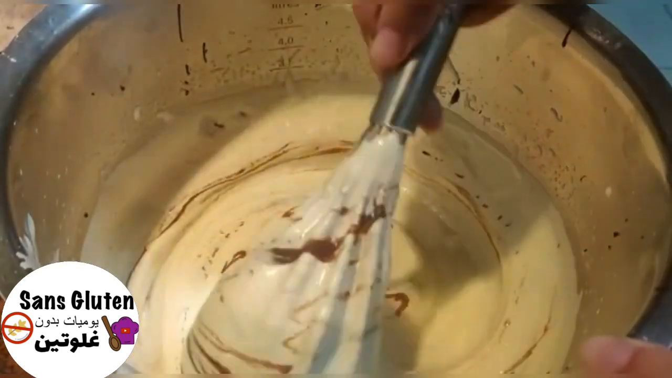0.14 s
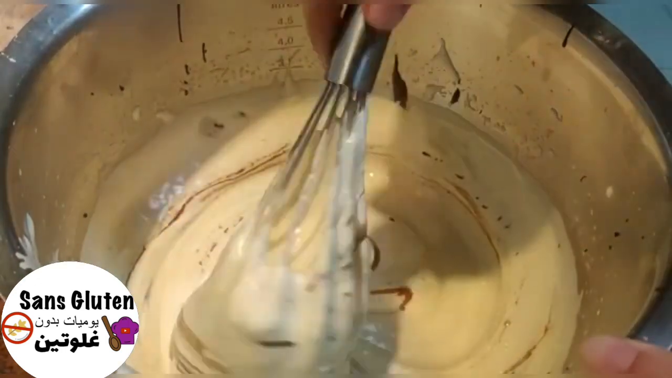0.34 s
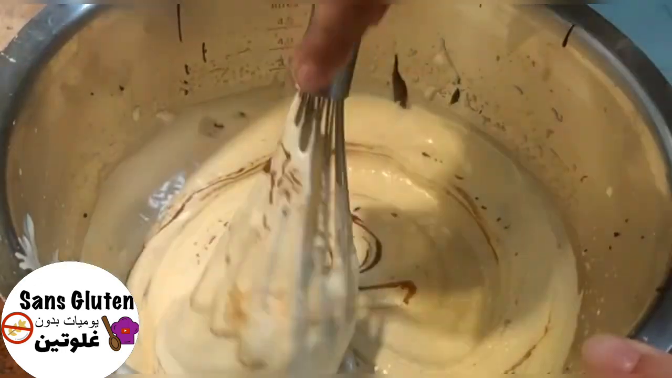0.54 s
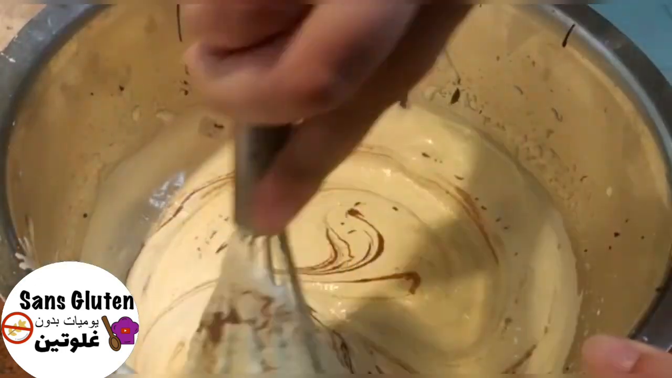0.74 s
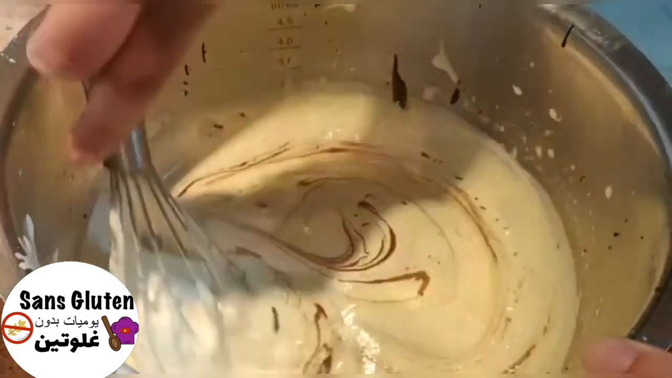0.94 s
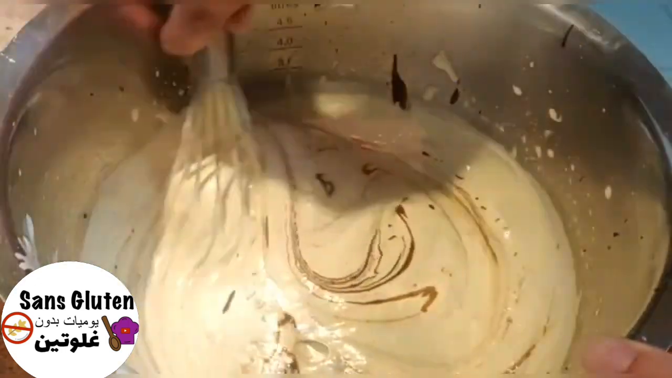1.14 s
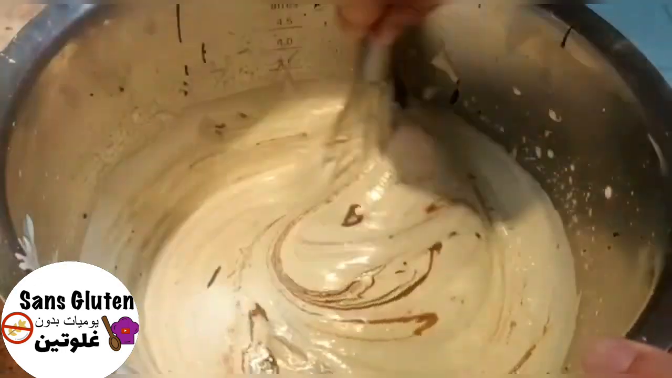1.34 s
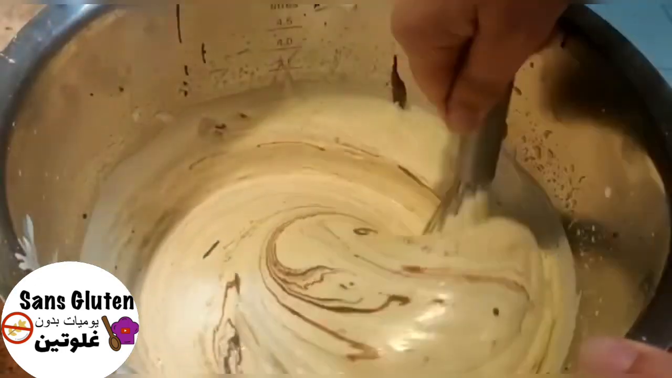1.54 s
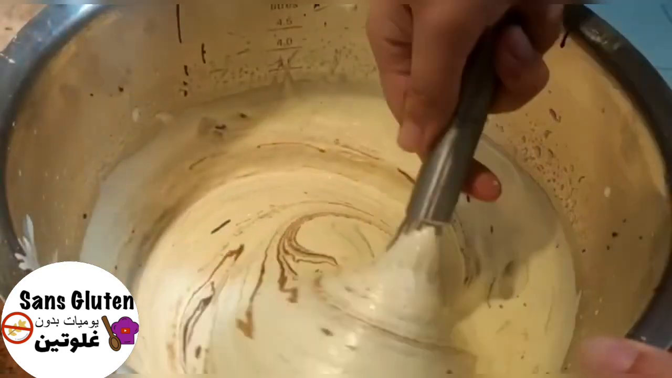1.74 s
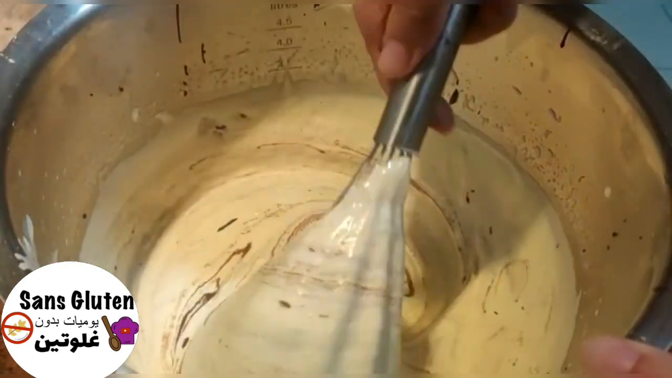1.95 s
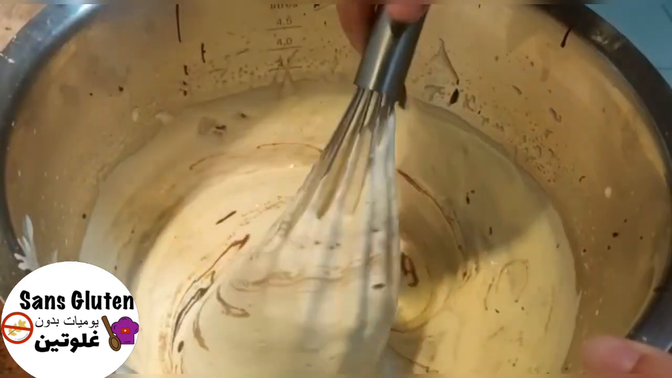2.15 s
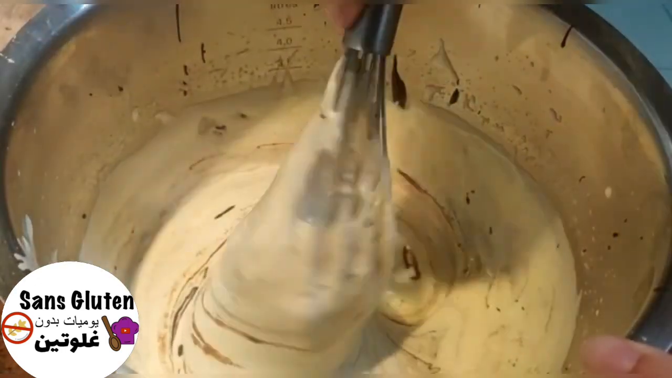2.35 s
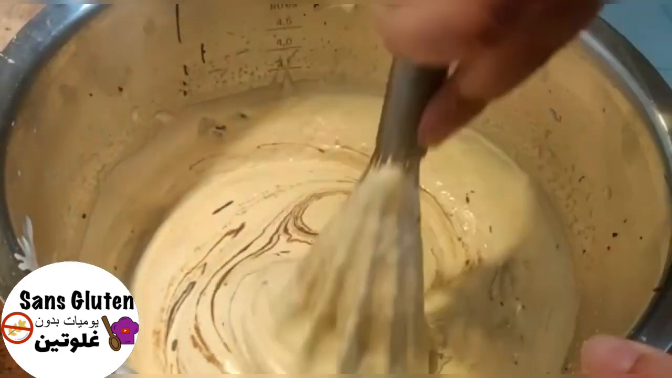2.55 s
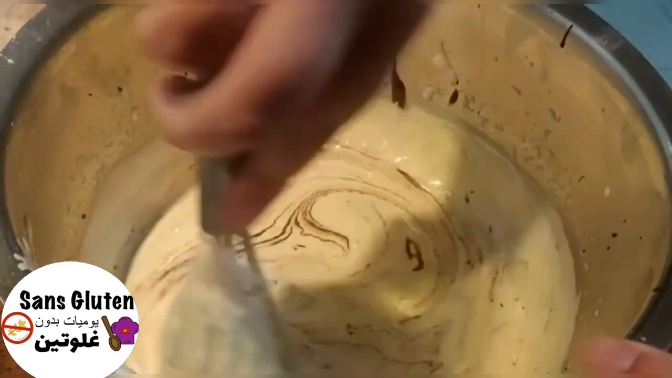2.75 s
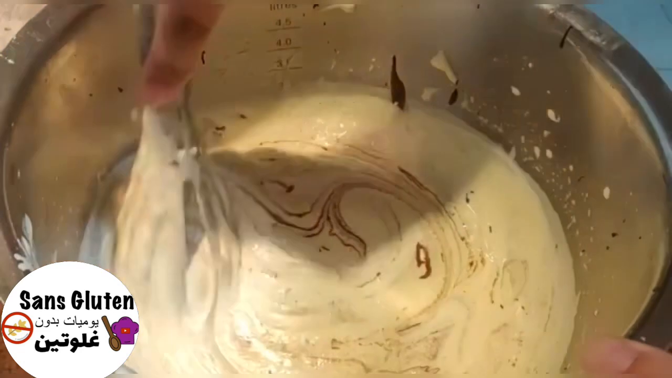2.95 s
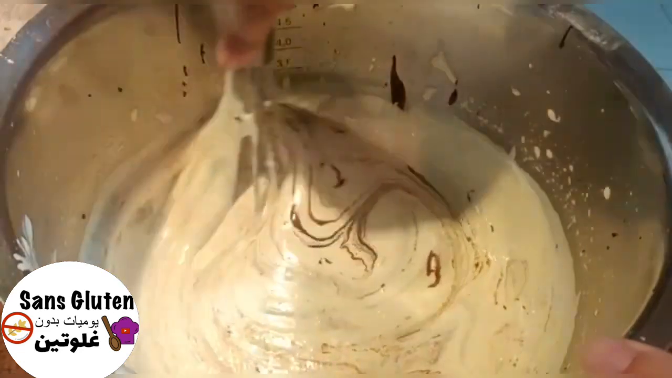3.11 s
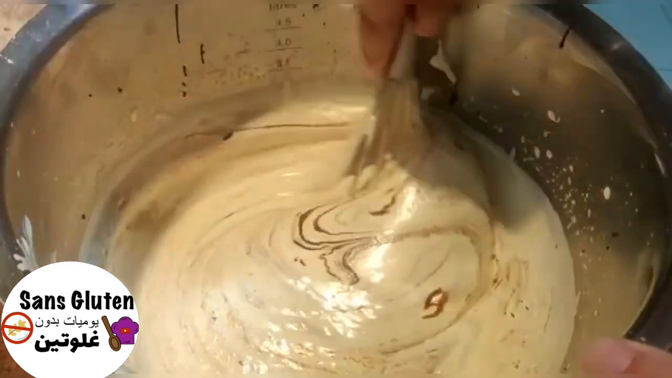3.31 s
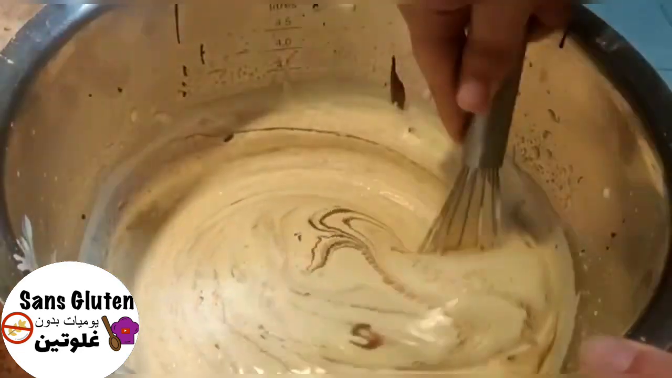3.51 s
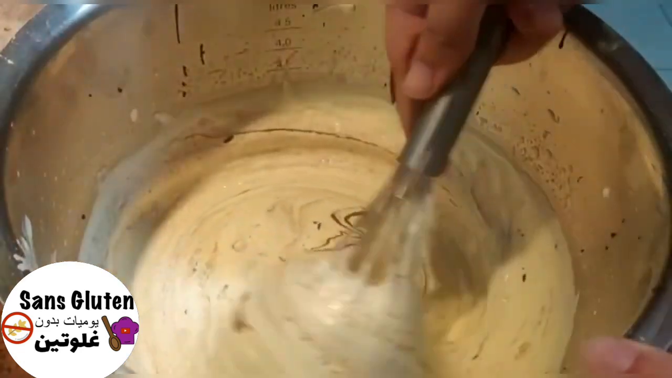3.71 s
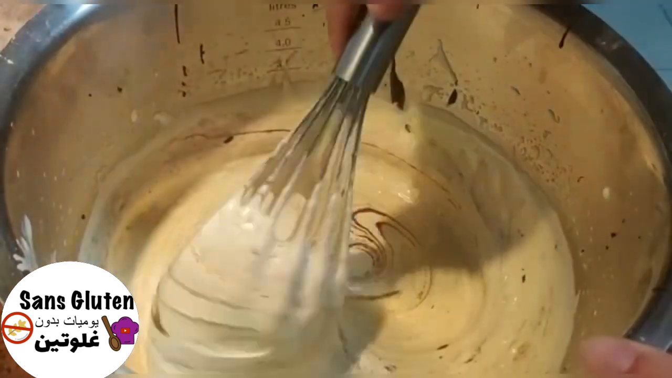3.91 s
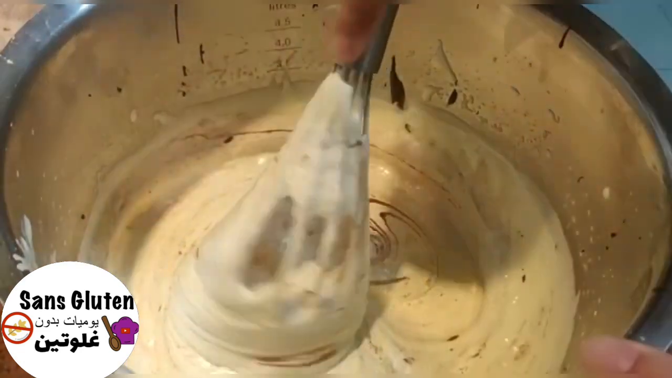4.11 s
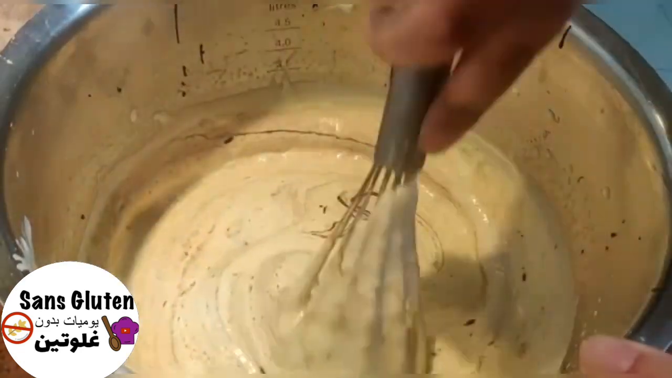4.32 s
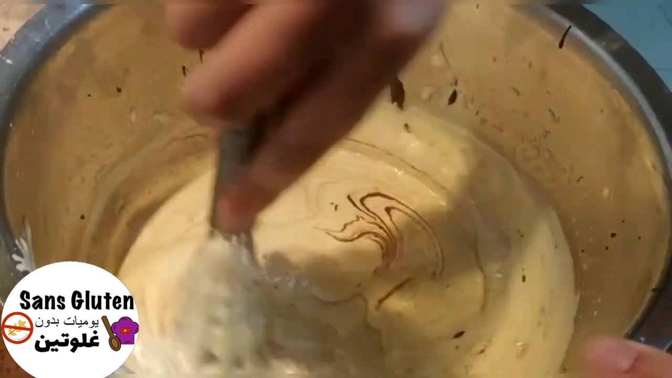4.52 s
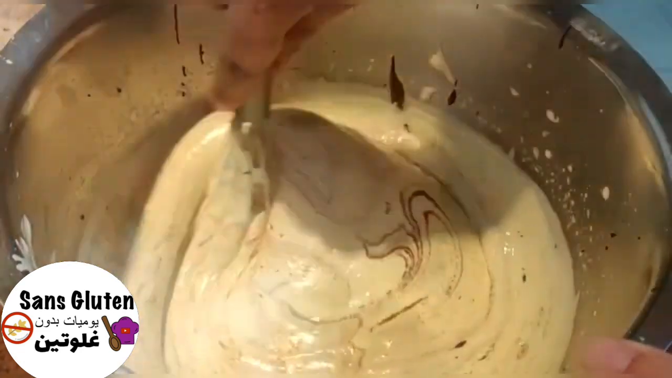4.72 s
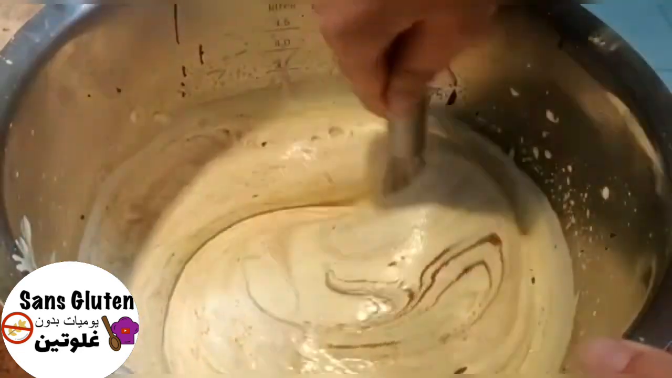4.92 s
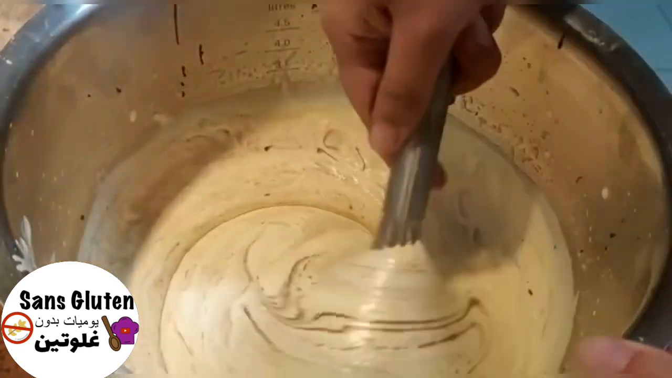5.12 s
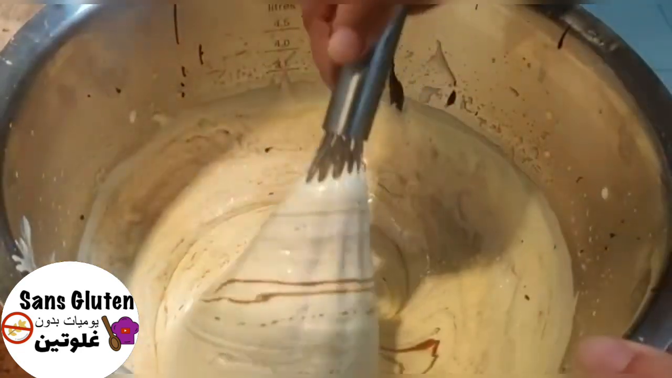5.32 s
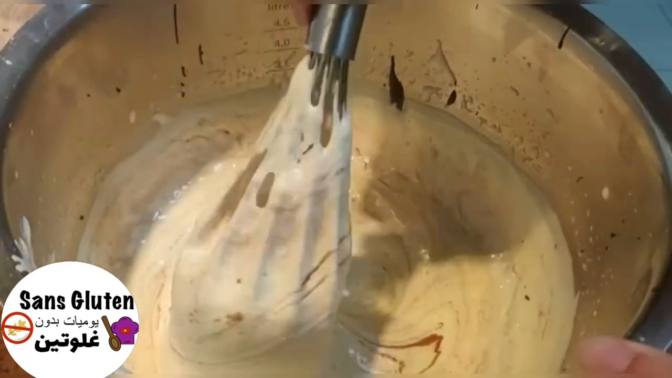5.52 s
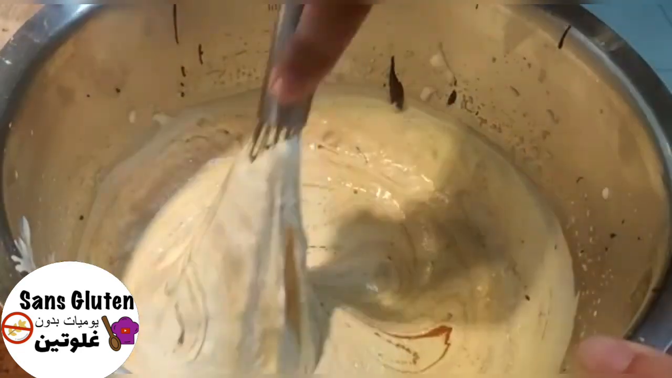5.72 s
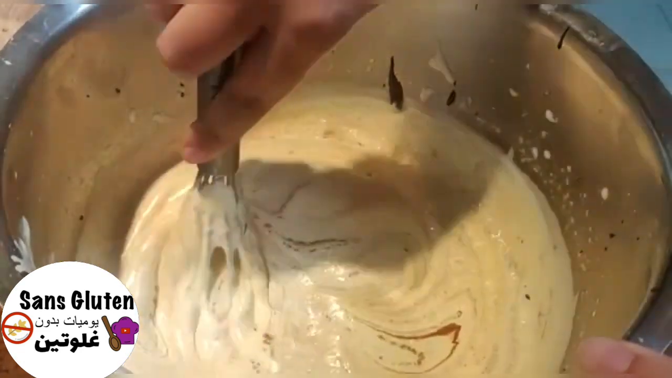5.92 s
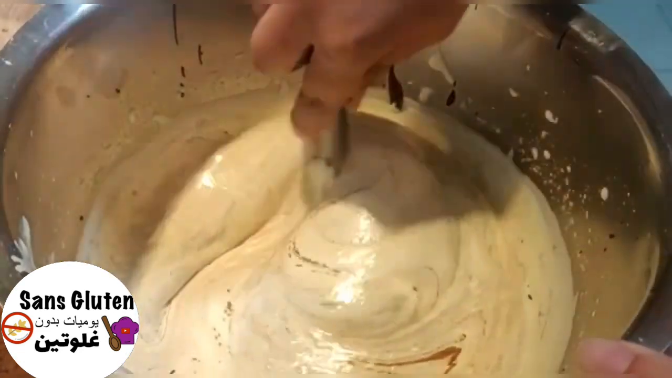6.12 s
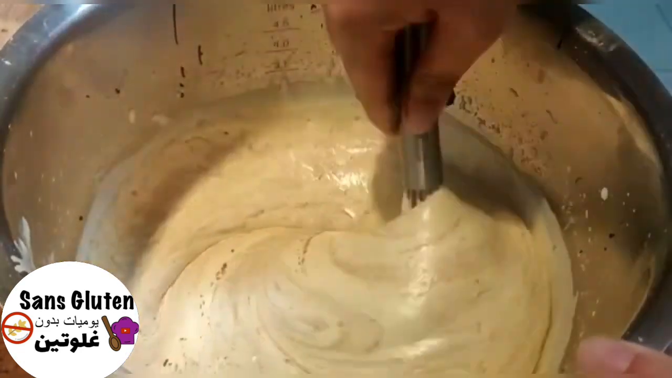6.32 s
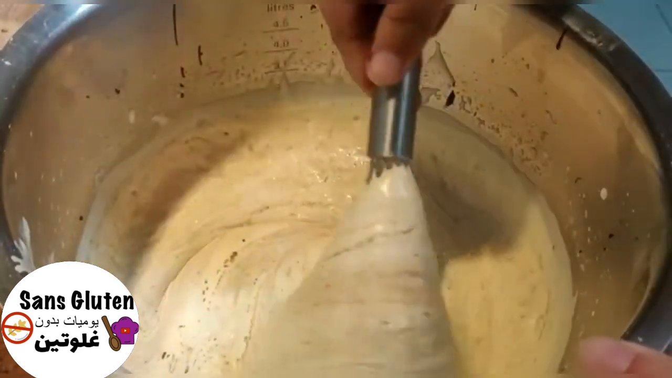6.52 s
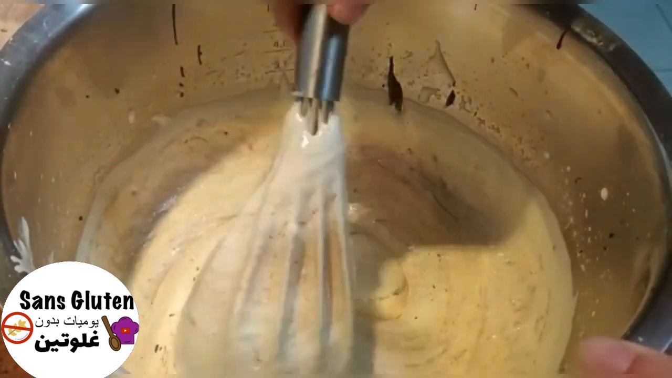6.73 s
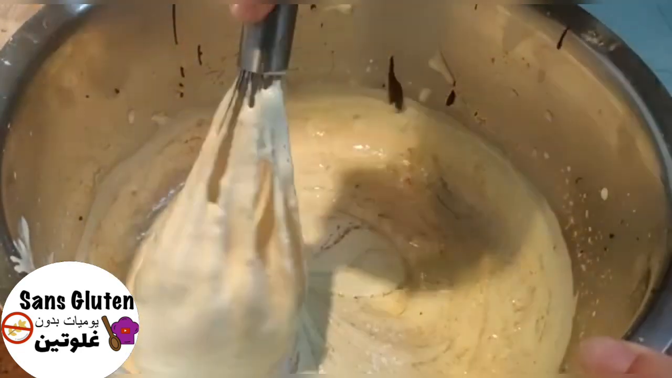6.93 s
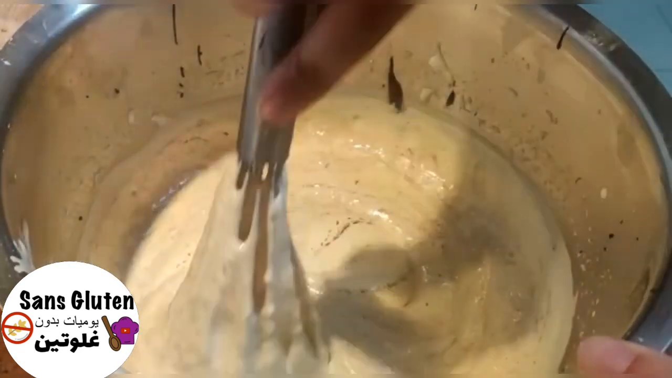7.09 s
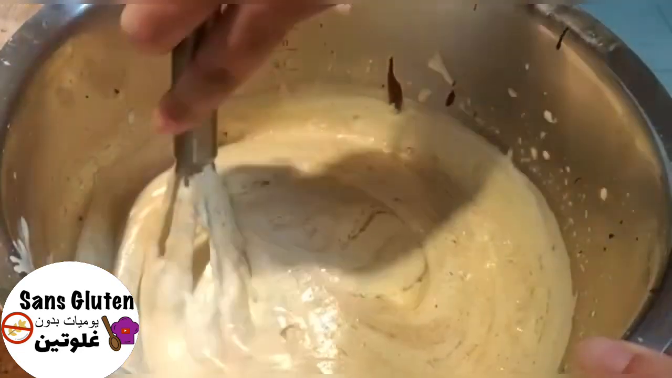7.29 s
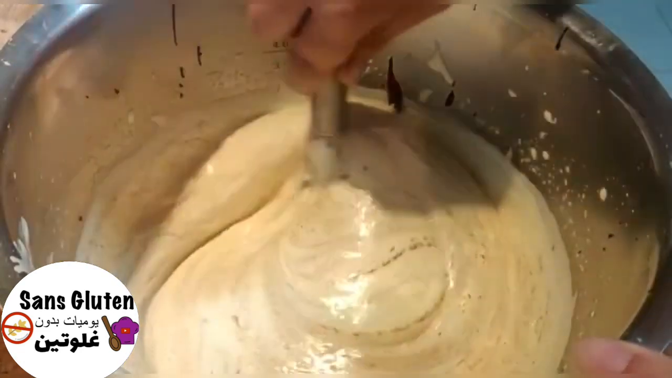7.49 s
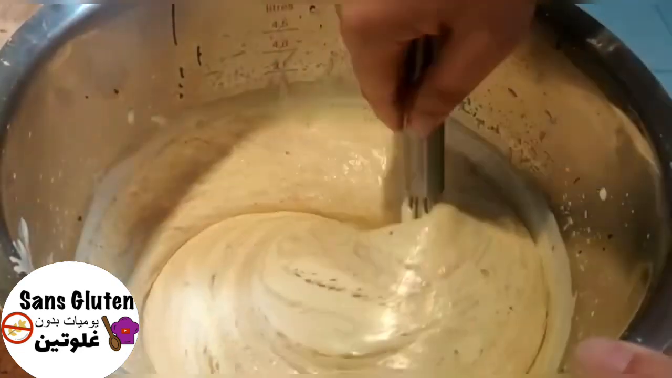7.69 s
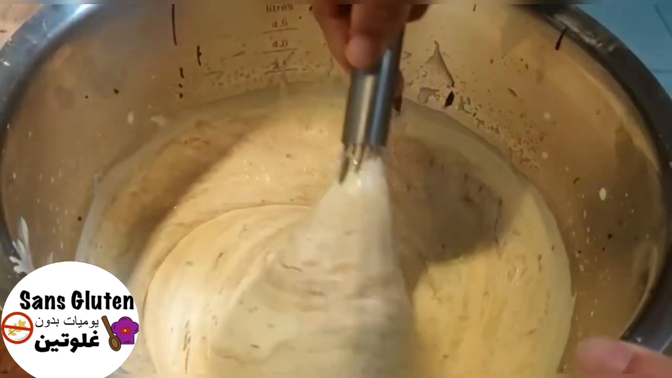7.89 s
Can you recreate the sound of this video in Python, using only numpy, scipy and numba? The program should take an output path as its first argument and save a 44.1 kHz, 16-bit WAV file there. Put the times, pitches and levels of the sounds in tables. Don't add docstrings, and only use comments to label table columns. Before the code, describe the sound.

A wire whisk scrapes around a steel bowl in five separate strokes, each starting with a rattling tap, over faint kitchen hum and hiss.

```python
import sys
import numpy as np
from scipy import signal
from scipy.fft import rfft, irfft, next_fast_len
from scipy.io import wavfile
from scipy.ndimage import uniform_filter1d, minimum_filter1d
from numba import njit

SR = 44100
rng = np.random.default_rng(int(sys.argv[2]) if len(sys.argv) > 2 else 0)


def convert_level_to_amplitude(level_db):
    exponent = np.asarray(level_db, float) / 20
    return 10 ** exponent


def dump(signal):
    limited = np.clip(np.atleast_2d(signal).T, -1, 1)
    pcm = np.round(limited * 32767).astype(np.int16)
    wavfile.write(sys.argv[1], SR, pcm)


N = 350595

# (time [s], peak [dB], low knock [dB], left minus right [dB], fade [s])
TAP_EVENTS = [
    (0.399, -29, -13.5, 0, 0.066),
    (2.3307, -18.5, -47, 4.5, 0.031),
    (4.115, -22, -43, 3, 0.028),
    (5.493, -24.5, -27, 6, 0.2),
    (6.8182, -27.5, -32, 1, 0.056),
]


def level(x, db):
    return x * convert_level_to_amplitude(db) / np.sqrt(np.mean(x ** 2))


def on_log(table, hz):
    table_hz, values = np.transpose(table)
    return np.interp(np.log(hz), np.log(table_hz), values)


def colour(x, table, size=1024):
    hz = np.maximum(np.fft.rfftfreq(size, 1 / SR), 1)
    cepstrum = irfft(np.log(convert_level_to_amplitude(on_log(table, hz))))
    cepstrum[1:size // 2] *= 2
    cepstrum[size // 2 + 1:] = 0
    return signal.fftconvolve(x, irfft(np.exp(rfft(cepstrum))))[:N]


@njit
def resonance(x, centre_hz, width_hz):
    y, band, low = np.empty(len(x)), 0., 0.
    for i in range(len(x)):
        g, k = np.tan(np.pi * centre_hz[i] / SR), width_hz / centre_hz[i]
        v = (band + g * (x[i] - low)) / (1 + g * (g + k))
        band, low, y[i] = 2 * v - band, low + 2 * g * v, k * v
    return y


def walk(rate_hz):
    hold = max(int(SR / rate_hz), 1)
    steps = np.repeat(rng.standard_normal(N // hold + 1), hold)
    return uniform_filter1d(uniform_filter1d(steps, hold), hold)[:N]


def split(x):
    edges_hz = [110, 900, 2800, 9000]
    size = next_fast_len(N)
    hz, spec = np.fft.rfftfreq(size, 1 / SR), rfft(x, size)
    above = [1 - 1 / (1 + (hz / edge) ** 6) for edge in edges_hz] + [0]
    return [irfft(spec * (lo - hi), size)[:, :N] for lo, hi in zip(above, above[1:])]


def sides(pan_db):
    return convert_level_to_amplitude(np.array([pan_db - 6, 6 - pan_db]) / 2)


def ports(pair, main_hz):
    # (frequency [Hz], level [dB])
    left_shape = [(100, -22), (300, -28), (800, -24), (1400, -21), (2700, -22), (3900, -17), (5700, -13),
                  (6800, -15), (7600, -21), (8600, -29), (11000, -31), (15500, -34)]
    right_shape = [(100, -22), (300, -28), (450, -20), (900, -25), (1700, -25), (2800, -18), (4500, -16),
                   (6500, -12), (8300, -12), (9500, -22), (10500, -29), (12000, -27), (15500, -32)]
    # (multiple of a third of main_hz, width [Hz], lift [dB])
    tube = [(1., 720, 8), (3., 620, 13), (5.05, 620, 9), (7.1, 800, 8)]
    left = colour(pair[0], left_shape)
    for multiple, width_hz, lift_db in tube:
        left = left + (convert_level_to_amplitude(lift_db) - 1) * resonance(left, multiple * main_hz / 3, 1. * width_hz)
    return np.array([left, colour(pair[1], right_shape)])


def kitchen():
    # (frequency [Hz], level [dB])
    hiss_shape = [(20, 7.5), (40, -8.5), (80, -0.5), (140, -6.5), (300, -5), (600, -12.5), (1000, -17),
                  (1900, -26.5), (3600, -28.5), (5700, -36), (8000, -31), (11000, -26.5), (13500, -29),
                  (16000, -28)]
    lines_hz = [49.2, 65, 33, 166, 300, 420.5]
    # (level [dB], wobble [dB], left minus right [dB])
    lines = [(-60, .8, .5), (-73, 1.5, .5), (-78, 1.5, .5), (-81, 2.2, .7), (-84, 2.2, -1.5),
             (-74.5, 1.8, -4)]
    size = next_fast_len(N)
    hz = np.maximum(np.fft.rfftfreq(size, 1 / SR), 1)
    mid, side = rfft(rng.standard_normal((2, size)))
    apart = np.clip(hz / 500, .5, 1)
    spec = (mid + np.outer([1, -1], apart * side)) / np.sqrt(1 + apart ** 2)
    hiss = irfft(convert_level_to_amplitude(on_log(hiss_shape, hz)) * spec, size)[:, :N]
    out, t = level(ports(hiss, np.full(N, 5700.)), -62.5), np.arange(N) / SR
    for f_hz, (db, wobble_db, pan_db) in zip(lines_hz, lines):
        tone = np.sin(2 * np.pi * f_hz * t + 0.4 * walk(7.3))
        tone = np.sqrt(2) * convert_level_to_amplitude(db + wobble_db * walk(9.8)) * tone
        out += tone * convert_level_to_amplitude(np.array([[pan_db], [-pan_db]]) / 2)
    return out


def room(x, t60_s, onset_s):
    t = np.arange(SR // 2) / SR
    tail = rng.standard_normal((2, len(t))) * (1 - np.exp(-t / onset_s)) * convert_level_to_amplitude(-60 * t / t60_s)
    tail = signal.lfilter([1], [1, -.4], tail)
    tail /= np.sqrt(np.sum(tail ** 2, axis=1, keepdims=True))
    return signal.fftconvolve(x, tail, axes=1)[:, :N]


def booms():
    boom_db = [-57, -53.5, -61, -59, -63]
    boom_hz, width_hz, t60_s = 178., 130., 0.82
    t, gain = np.arange(N) / SR, np.zeros(N)
    for tap, db in zip(TAP_EVENTS, boom_db):
        gain += (t >= tap[0]) * convert_level_to_amplitude(db - 60 * np.maximum(t - tap[0], 0) / t60_s)
    return gain * level(resonance(rng.standard_normal(N), np.full(N, boom_hz), width_hz), 0)


def taps(table, main_hz, landing_s, fade_db):
    t, rattle, knock = np.arange(SR // 8) / SR, np.zeros((2, N)), np.zeros(N)
    for s, db, knock_db, pan_db, fade_s in table:
        i = int(s * SR)
        damping = convert_level_to_amplitude(fade_db - 60 * (t - landing_s) / max(fade_s, .004))
        landing = np.where(t < landing_s, 1, damping)
        spikes = convert_level_to_amplitude(2.17 * rng.exponential(size=len(t)))
        burst = landing * rng.standard_normal((2, len(t))) * spikes
        rattle[:, i:i + len(t)] += convert_level_to_amplitude(db) * sides(pan_db + 0.5)[:, None] * burst
        knock[i:i + len(t)] += convert_level_to_amplitude(db + knock_db) * burst[0]
    thud = signal.sosfilt(signal.butter(2, (150, 700), "band", fs=SR, output="sos"), knock)
    return convert_level_to_amplitude(4.5) * ports(rattle, main_hz) + convert_level_to_amplitude(4.0) * thud


def strokes():
    # (wall share [dB], bright share [dB], patch at tap [Hz], at lift [Hz], lift-off [dB/s])
    plan = [(-17.5, -13.5, 3060, 4400, 800), (-14.5, -13.5, 3170, 3980, 696),
            (-16, -11.5, 3600, 4160, 850.5), (-18.5, -9.5, 3860, 4660, 304), (-15.5, -9.5, 3000, 4760, 546)]
    # (time [s], scrape level [dB])
    pressure = [
        [(.41, -47), (.548, -40.5), (.58, -33), (.688, -32), (.926, -33.5), (1.038, -36.5), (1.138, -32.5),
         (1.248, -40), (1.39, -34)],
        [(2.34, -41.5), (2.362, -51), (2.408, -56), (2.475, -38), (2.745, -36), (2.765, -41), (3.02, -40),
         (3.045, -35.5), (3.19, -36)],
        [(4.126, -51), (4.176, -37.5), (4.27, -30.5), (4.4, -34), (4.55, -37.5), (4.582, -47), (4.658, -43),
         (4.68, -36), (4.72, -37)],
        [(5.5, -52), (5.538, -38.5), (5.708, -54.5), (5.784, -53), (5.848, -45), (5.922, -44), (5.97, -28.5),
         (5.994, -35), (6.03, -46)],
        [(6.826, -46), (6.87, -37.5), (6.928, -33.5), (7.032, -37), (7.082, -46.5), (7.206, -47.5),
         (7.286, -46.5), (7.346, -46.5)],
    ]
    # (time [s], depth [dB], negative digs in, half width [s])
    skips = [(.642, 1.5, .04), (.776, 6, 0.077), (0.89, 8.5, 0.052), (2.596, 3, 0.016), (4.435, 3, 0.031),
             (3.09, 2, 0.038), (7.0, 4.5, .02), (1.12, -2, .06), (6.97, -3, .03), (.74, 2, .03)]
    t = np.arange(N) / SR
    db, wall_db, bright_db, bowl_hz = np.full(N, -200.), np.zeros(N), np.zeros(N), np.full(N, 3500.)
    for tap, curve, (wall, bright, from_hz, to_hz, lift_db_per_s) in zip(TAP_EVENTS, pressure, plan):
        s, press_db = np.transpose(curve)
        on = t >= tap[0]
        db[on] = (np.interp(t, s, press_db) - lift_db_per_s * np.maximum(t - s[-1], 0))[on]
        wall_db[on], bright_db[on] = wall, bright
        bowl_hz[on] = np.interp(t[on], (tap[0], s[-1]), (from_hz, to_hz))
    for s, depth_db, half_s in skips:
        db -= depth_db * np.maximum(1 - np.abs(t - s) / half_s, 0)
    return db, wall_db, bright_db, bowl_hz


def far_wall(x, lag_s, drift, share):
    lag = np.round(SR * lag_s * np.exp(drift * walk(3))).astype(int)
    return x + share * x[np.maximum(np.arange(N) - lag, 0)]


def steel(x, bowl_hz):
    # (frequency [Hz], width [Hz], lift [dB])
    modes = [(1400, 160, 6), (3150, 220, 6), (4500, 240, 5), (6600, 300, 4), (8200, 320, 4)]
    x = x + 0.43 * resonance(x, bowl_hz, 630.0)
    for hz, width_hz, lift_db in modes:
        lift = convert_level_to_amplitude(lift_db * walk(4.035)) - 1
        x = x + lift * resonance(x, hz * (1 + .05 * walk(2.5)), 1. * width_hz)
    return x


def scrape(main_hz, bowl_hz, db, shares_db, pan_db):
    bunching = convert_level_to_amplitude(1.15 * walk(30) + 1.2 * walk(150) + 0.85 * walk(500))
    ticks = rng.standard_normal((3, N)) * convert_level_to_amplitude(1.23 * rng.exponential(size=(3, N))) * bunching
    pair = []
    for own in ticks[:2]:
        near = far_wall(own + .3 * ticks[2], .0004, .3, .3)
        pair.append(far_wall(near, .0008, .4, .15))
    pair = [steel(p, bowl_hz) for p in pair]
    parts = split(ports(pair, main_hz))
    parts[0] = parts[0] + .2 * parts[0][::-1]
    low, *high = (level(p, 1.0) * convert_level_to_amplitude(db + s + 1.28 * walk(12)) for p, s in zip(parts, shares_db))
    return low + sum(high) * sides(pan_db)


def hollowed(pair):
    # (start [s], end [s], from [Hz], to [Hz], gain [dB])
    hollows = [(0.783, 1.28, 2750, 2900, -5.5), (1.065, 1.18, 1750, 1800, 5),
               (2.345, 2.462, 3700, 3600, -12), (2.47, 2.647, 2300, 2450, 0.5),
               (3.097, 3.3, 2080, 2000, -7), (3.13, 3.21, 1300, 1300, 4.5), (4.135, 4.35, 2930, 3240, 2),
               (4.15, 4.45, 5500, 5600, 3), (4.46, 4.56, 2600, 2700, -10), (4.6, 4.8, 3210, 2690, -9),
               (4.66, 4.74, 1600, 1700, 5), (4.675, 4.75, 4300, 4300, 5), (5.5, 5.68, 3400, 3400, -25),
               (5.7, 5.828, 3710, 2500, -20), (5.94, 6.025, 1790, 1790, 2.5), (6.84, 6.918, 3500, 3520, -6),
               (6.84, 7.008, 2200, 2100, -6), (6.934, 7.02, 1010, 1010, 5.5),
               (7.077, 7.447, 2560, 3400, -14), (2.32, 2.36, 1200, 1200, -10), (4.1, 4.14, 1800, 1800, -10),
               (.75, 1.05, 1250, 1250, 4), (7.28, 7.4, 1300, 1300, -6), (5.93, 6.08, 8600, 8600, 6)]
    out = pair.copy()
    for start_s, end_s, from_hz, to_hz, gain_db in hollows:
        on = slice(int(start_s * SR), int(end_s * SR))
        count = on.stop - on.start
        share = (convert_level_to_amplitude(gain_db) - 1) * signal.windows.tukey(count, .4)
        for x in out:
            x[on] += share * resonance(x[on].copy(), np.linspace(from_hz, to_hz, count), 540.)
    return out


def scene():
    # (time [s], frequency [Hz])
    main_curves = [
        [(0.42, 5170), (0.66, 5780), (1.166, 5630), (1.252, 5130), (1.4, 5800)],
        [(2.35, 5460), (2.578, 5840), (2.798, 5580), (2.888, 6060), (3.2, 5170)],
        [(4.13, 5250), (4.548, 5560), (4.666, 5450), (4.74, 5610)],
        [(5.5, 5080), (5.654, 5520), (5.876, 5400), (5.912, 5940), (6.04, 5660)],
        [(6.83, 5700), (6.864, 5120), (7.216, 5550), (7.238, 5800), (7.36, 5740)],
    ]
    # (time [s], peak [dB], left minus right [dB])
    catch_events = [(0.5573, -28, 8), (0.601, -24, 1), (0.6632, -17, 3.3), (0.814, -22.5, 8),
                    (0.912, -22, 0), (1.0605, -18, 13), (1.1039, -27, 5), (1.2283, -23.5, 17),
                    (2.465, -26, 2.5), (2.5212, -27, 9), (2.5755, -29, 9), (2.609, -25, 14),
                    (2.666, -21, 4.5), (2.708, -31, 11), (2.8084, -25.5, 14), (2.8848, -21, 10),
                    (4.1415, -22, 2.5), (4.1601, -25, 3), (4.1965, -28, 3.1), (4.325, -20.5, 10),
                    (4.479, -18, 3), (4.595, -27, 8), (4.67, -30, 4.2), (5.548, -23, 9), (5.0883, -50, 3.5),
                    (5.99, -18, 8)]
    db, wall_db, bright_db, bowl_hz = strokes()
    main_hz = np.interp(np.arange(N) / SR, *np.vstack(main_curves).T)
    firm_db = np.clip(db + 38, -20, 10)
    rumble_db = -23.5 - 0.54 * firm_db
    shares_db = (rumble_db, wall_db - 0.1 * firm_db, 0, bright_db - 0.03 * firm_db)
    pan_db = 5.5 + 0.29 * firm_db
    bowl = scrape(main_hz, bowl_hz, db, shares_db, pan_db)
    knock_db, fade_s = -32, 0.015
    catches = [(s, peak_db, knock_db, pan, fade_s) for s, peak_db, pan in catch_events]
    bowl += taps(TAP_EVENTS, main_hz, landing_s=0.0056, fade_db=-5)
    bowl += convert_level_to_amplitude(-6.5) * taps(catches, main_hz, landing_s=0.0053, fade_db=-13.5)
    tail = convert_level_to_amplitude(-12.5) * room(bowl, t60_s=0.39, onset_s=0.003)
    return hollowed(bowl + tail) + kitchen() + booms()


def thin(x, size=1024, channels=8):
    # (frequency [Hz], depth [dB])
    thinning = [(1200, 25), (1900, 7), (2500, 4), (3600, 3.6), (5000, 5.5), (7500, 4.5), (8500, 2.5),
                (11000, 1.7), (16000, 1.9)]
    wobble_db, attack_jump_db = 1.9, 9
    hz, _, spec = signal.stft(x, SR, nperseg=size)
    power = np.abs(spec[:, :-1]) ** 2 + 1e-18
    power = power.reshape(2, -1, channels, power.shape[-1]).sum(2)
    bands_db = 10 * np.log10(uniform_filter1d(power, size=2))
    bands_db = (bands_db + bands_db.mean(0)) / 2
    around_db = uniform_filter1d(bands_db, size=5, axis=1)
    wobble = uniform_filter1d(rng.standard_normal(around_db.shape[1:]), size=4) * 2
    around_db += wobble_db * wobble
    kept = bands_db > around_db - on_log(thinning, hz[channels // 2:-1:channels])[:, None]
    jump = np.diff(bands_db[0].mean(0), append=0) > attack_jump_db
    kept = np.maximum(minimum_filter1d(1. * kept, size=3), uniform_filter1d(1. * jump, size=5) > 0)
    spec[:, :-1] *= np.repeat(kept, channels, axis=1)
    return signal.istft(spec, SR, nperseg=size)[1][:, :N]


def roll_off(x):
    return signal.sosfilt(signal.butter(12, 16600, fs=SR, output="sos"), x)


def record(dry):
    low_pass = signal.ellip(10, .2, 80, 15780, fs=SR, output="sos")
    mix = thin(signal.sosfilt(low_pass, dry))
    return roll_off(mix)


dry = scene()
out = record(dry)
dump(out)
```